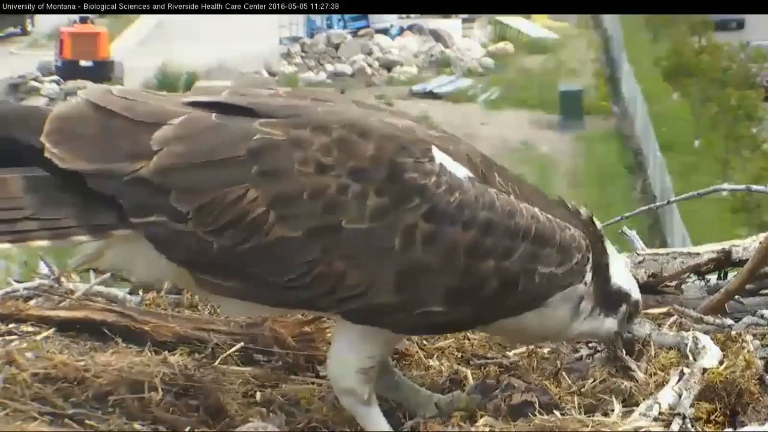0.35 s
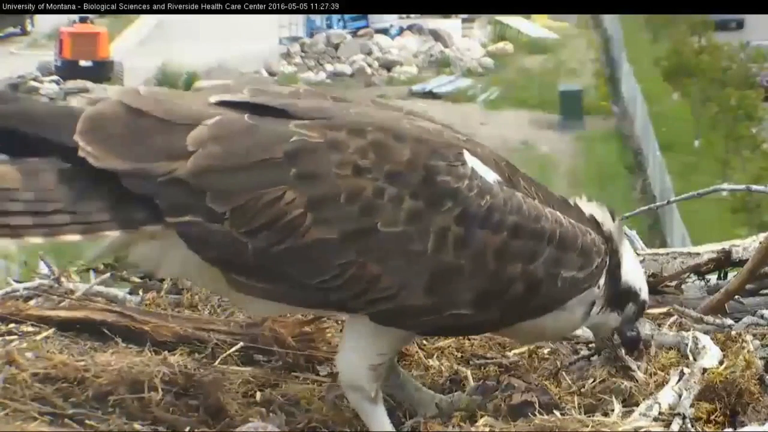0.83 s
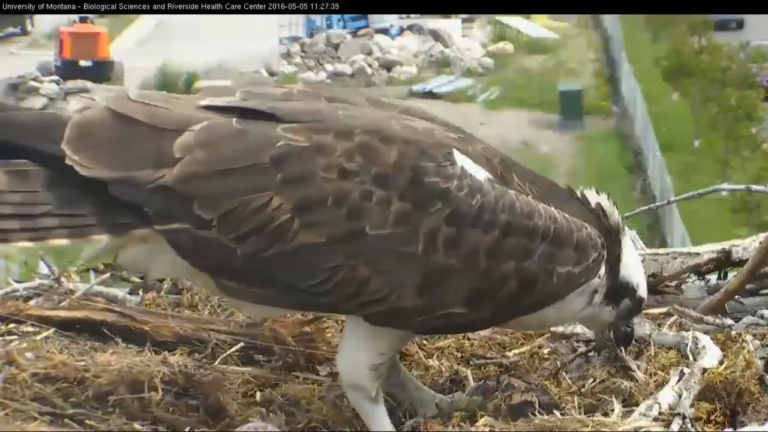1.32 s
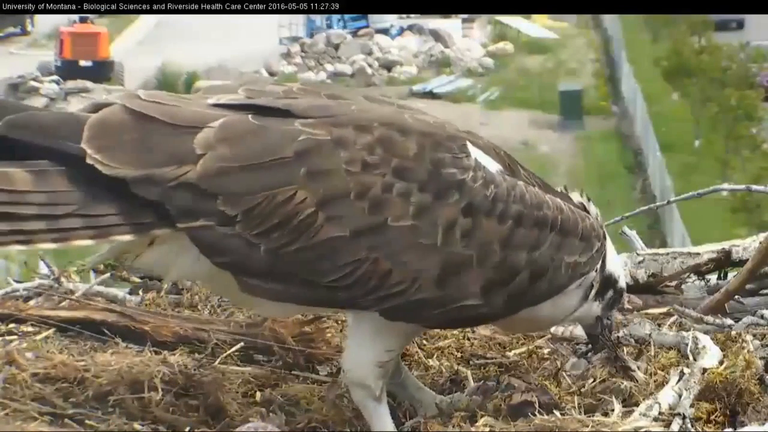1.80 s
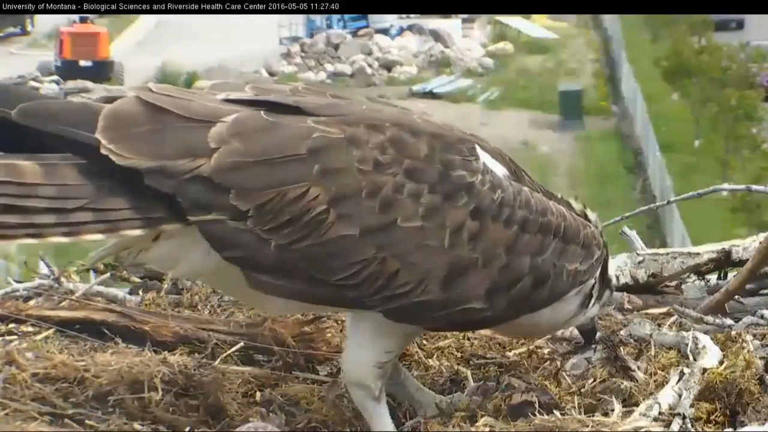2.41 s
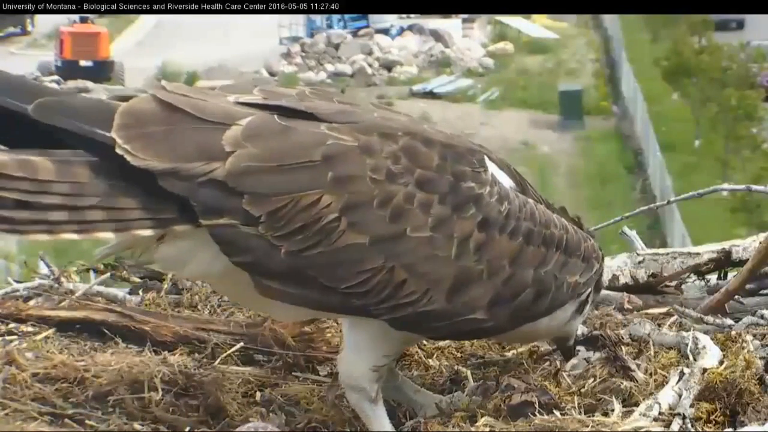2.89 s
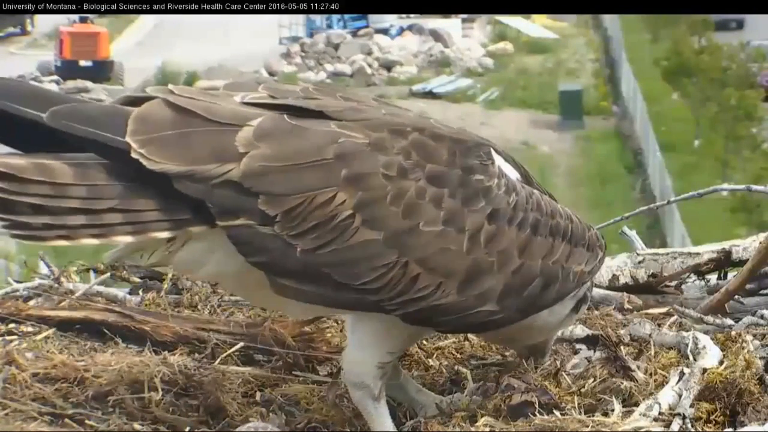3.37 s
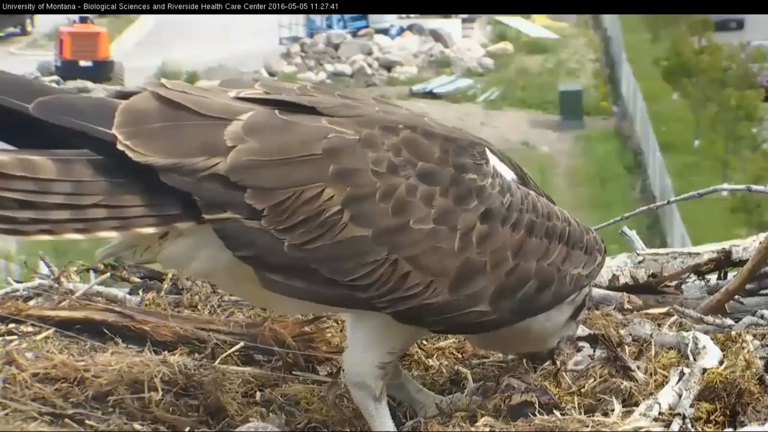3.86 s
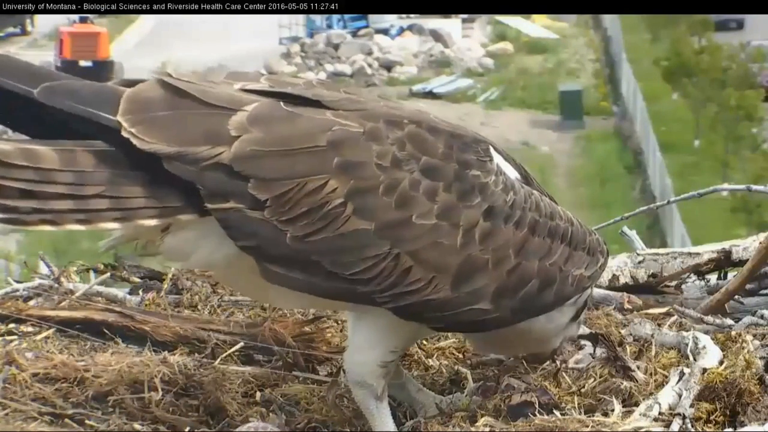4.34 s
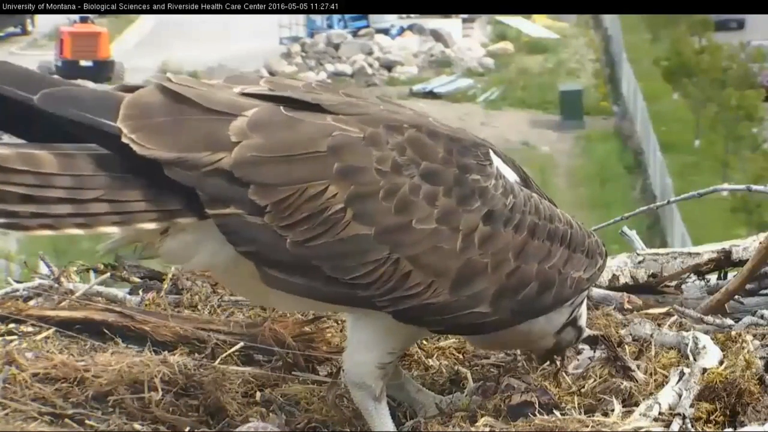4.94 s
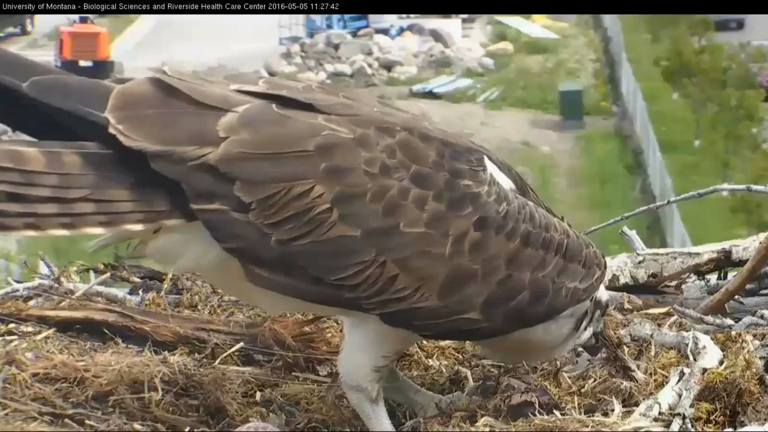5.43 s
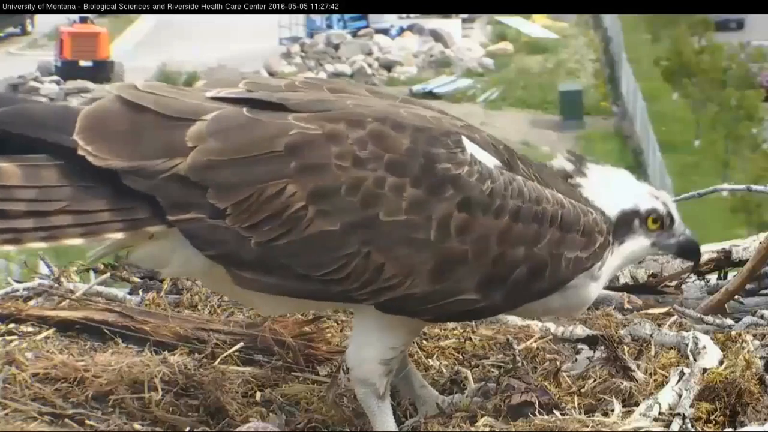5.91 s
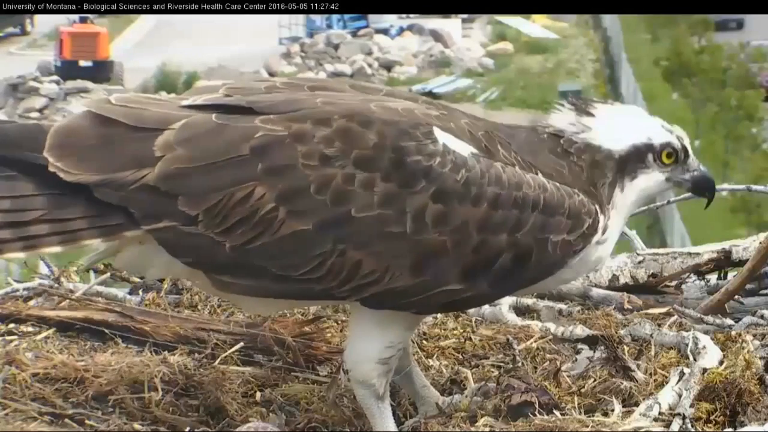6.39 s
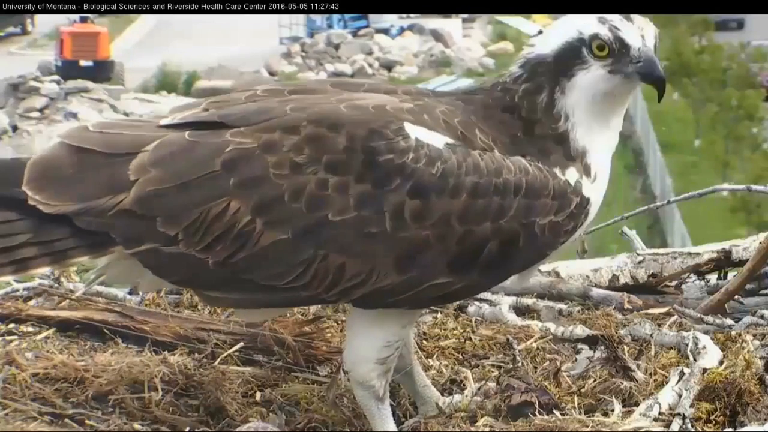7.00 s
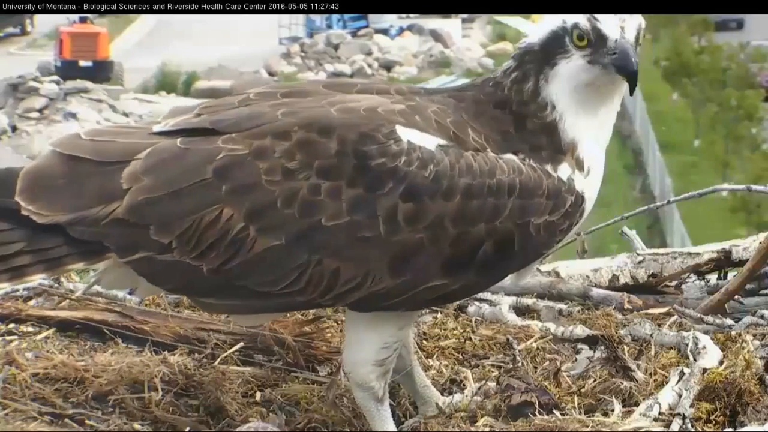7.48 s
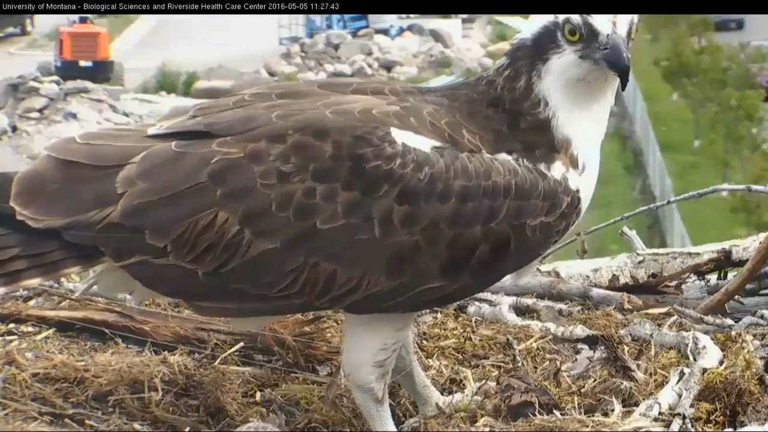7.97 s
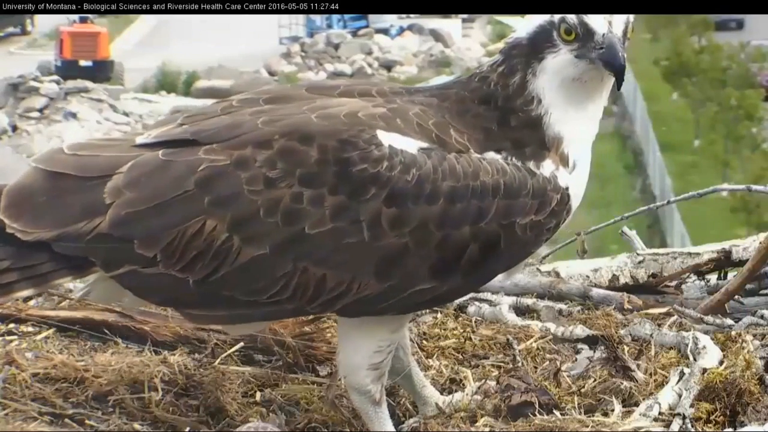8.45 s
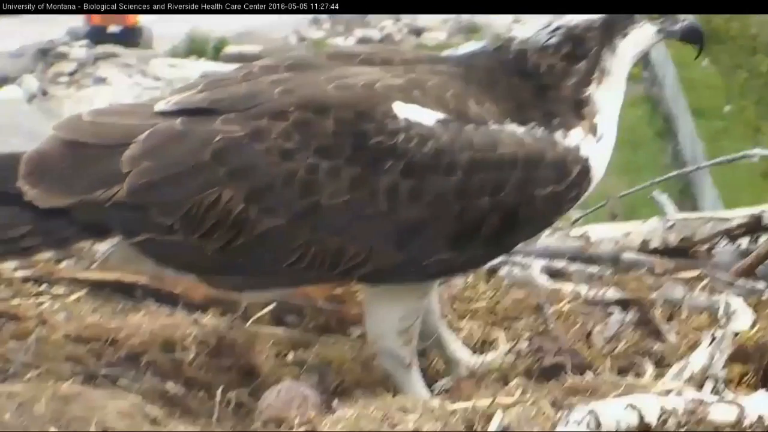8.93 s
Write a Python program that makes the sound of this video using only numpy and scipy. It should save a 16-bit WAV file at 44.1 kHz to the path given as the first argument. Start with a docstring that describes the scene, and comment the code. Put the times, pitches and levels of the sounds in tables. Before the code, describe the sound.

A continuous, slightly fluttering distant traffic roar, low rumble plus a smooth midrange rush, fills the outdoor space and grows very slightly. Beneath it a machine hums steadily, and a faint thin whine wanders up and down, mostly absent from about 4.5 to 6 seconds. The feed blinks off at 0.5, stutters rapidly from 2.5 to 2.7, falls nearly silent until 3.1, then swells back. A small nearby bird gives rough, quick chirps, each a high falling slur followed by a lower note, at about 1.1, 2.2, 3.5, 4.8, 5.7, 6.7, 7.5 and 8.3, with short reflections. Dry twigs crackle and scrape at 5.8 and 6.1 to 6.4; a faint soft horn toots once at 6.1, and the rumble swells slightly near 6.4. Another stutter chops the sound from 8.2 to 8.7, cutting into the last chirp, before the roar and whine return to the end.

```python
"""Far road traffic roars below a high nest platform outdoors, mixed from two bands of coloured noise.
A machine hums on mains harmonics; a thin whine, one wandering sine, rises and falls in and out of earshot.
The microphone's feed breaks off several times and fades back in after each break.
A small bird close by repeats a slurred chirp about once a second, built from gliding arches of pitch.
Late on, nest twigs rustle as grainy noise bursts and a faint far horn toots once."""
import sys
import numpy as np
from scipy import signal
from scipy.fft import rfft, irfft, next_fast_len
from scipy.io import wavfile

SR = 44100
rng = np.random.default_rng(int(sys.argv[2]) if len(sys.argv) > 2 else 0)


def master_out(mix):
    """Clip the mix to full scale and print it as 16-bit PCM to the path in sys.argv[1]."""
    frames = np.transpose(np.atleast_2d(mix))
    ceiling = np.clip(frames, -1, 1)
    pcm = np.round(ceiling * 32767).astype(np.int16)
    wavfile.write(sys.argv[1], SR, pcm)


N = 406602
TIME_S = np.arange(N) / SR
PADDED = 2 * next_fast_len(N // 2 + 1)
BINS_HZ = np.arange(PADDED // 2 + 1) * SR / PADDED


def from_db(db):
    """Decibels to amplitude gain."""
    return 10 ** (np.asarray(db) / 20)


def rms_one(x):
    """Scale to rms 1."""
    return x / np.sqrt(np.mean(x ** 2) + 1e-20)


def drift(rate_hz):
    """Slow random curve of rms 1: low-passed white noise."""
    spectrum = rfft(rng.standard_normal(PADDED))
    return rms_one(irfft(spectrum / (1 + (BINS_HZ / rate_hz) ** 2))[:N])


def noise(spectrum):
    """Coloured noise of rms 1; falls away beyond the end points of its spectrum."""
    hz = np.maximum(BINS_HZ, 1)
    points_hz, density_db = np.transpose(spectrum)
    gain = from_db(np.interp(np.log(hz), np.log(points_hz), density_db))
    gain *= np.minimum(1, hz / points_hz[0]) ** 2
    gain *= np.minimum(1, points_hz[-1] / hz) ** 2
    return rms_one(irfft(rfft(rng.standard_normal(PADDED)) * gain)[:N])


def tone(hz):
    """Sine of rms 1 on a pitch curve, with random start phase."""
    cycles = np.cumsum(hz) / SR + rng.random()
    return np.sqrt(2) * np.sin(2 * np.pi * cycles)


def far_tone(hz):
    """Distant sine, slightly unsteady in pitch and level."""
    wobble_ratio, waver_db = .002, 1.6
    level = from_db(waver_db * drift(14.0))
    return level * tone(hz * (1 + wobble_ratio * drift(15.3)))


def in_time(rows):
    """Curve over TIME_S with cosine easing between turning points."""
    points_s, values = np.transpose(rows)
    index = np.arange(len(points_s))
    place = np.interp(TIME_S, points_s, index)
    eased = np.floor(place) + .5 - .5 * np.cos(np.pi * (place % 1))
    return np.interp(eased, index, values)


def envelope(age_s, length_s, attack_s, release_s):
    """Linear attack, hold and release; silent outside."""
    return np.clip(np.minimum(age_s / attack_s, (length_s - age_s) / release_s), 0, 1)


# far engine spectrum, relative: point_hz, density_db [dB per Hz]
RUMBLE_SPECTRUM = [(25, -29.5), (100, -29.5), (150, -21), (200, -5.5), (250, 0), (300, 1.5), (360, 0),
                   (440, -8), (560, -12), (700, -18.5), (820, -25), (1100, -37)]
# far tyre spectrum, relative: point_hz, density_db [dB per Hz]
TYRE_SPECTRUM = [(700, -41.5), (850, -20), (1050, -7.5), (1500, -3), (1900, -1.5), (2250, 1.5), (2600, 1),
                 (3100, -10), (4200, -8.5), (5200, -13), (5800, -22), (7000, -26.5), (10200, -26.5),
                 (11500, -49)]
RUMBLE_DB, TYRES_DB = -30.5, -25.0  # before rise and flutter
TRAFFIC_RISE_DB_PER_S = 0.0777
PASS_S, PASS_WIDTH_S, PASS_DB = 6.35, .3, 1.1  # a heavier vehicle swells the rumble once


def traffic(flutter_db=0.75):
    """Many far engines merge into a rumble, their tyres into a smooth rush."""
    rumble_db = RUMBLE_DB + PASS_DB / (1 + ((TIME_S - PASS_S) / PASS_WIDTH_S) ** 2)
    roar = from_db(rumble_db) * noise(RUMBLE_SPECTRUM) + from_db(TYRES_DB) * noise(TYRE_SPECTRUM)
    return roar * from_db(TRAFFIC_RISE_DB_PER_S * TIME_S + flutter_db * drift(4.5))


# hum lines: mains_multiple, level_db
HUM_LINES = [(1, -67), (2, -58.5), (3, -46), (4, -32.5), (6, -39.5)]
MAINS_HZ = 60


def hum(waver_db=1.0):
    """Mains-driven machinery; each harmonic wavers in level on its way through the air."""
    total = np.zeros(N)
    for mains_multiple, level_db in HUM_LINES:
        gain = from_db(level_db + waver_db * drift(3.5))
        total += gain * tone(np.full(N, round(mains_multiple) * MAINS_HZ))
    return total


# turning points of the machine's whine: time_s, pitch_hz
WHINE_PITCH = [(0, 1280), (.45, 1245), (1.25, 1255), (1.65, 1322), (2.0, 1268), (2.7, 1460), (3.1, 1470),
               (3.8, 1212), (4.22, 1202), (4.55, 1268), (6.0, 1270), (6.8, 1472), (7.55, 1378),
               (8.25, 1466), (9.2, 1458)]
# stretches in earshot: start_s, end_s, level_db
WHINE_HEARD_SPANS = [(.12, .85, -40), (.85, 1.92, -37.5), (2.055, 3.5, -39.5), (3.297, 4.55, -36.5),
                     (5.945, 7.3, -37), (7.8, 9.4, -35.5)]
WHINE_FADE_S = .15


def whine():
    """A far machine changes speed; its whine fades in and out of earshot."""
    heard = []
    for start_s, end_s, level_db in WHINE_HEARD_SPANS:
        fade = envelope(TIME_S - start_s, end_s - start_s, WHINE_FADE_S, WHINE_FADE_S)
        heard.append(from_db(level_db) * fade)
    return np.max(heard, axis=0) * far_tone(in_time(WHINE_PITCH))


# breaks in the feed: cut_s, back_s, recovery_s [time constant]
FEED_BREAKS = [(.479, .514, .08), (2.538, 2.553, .8), (2.575, 2.593, .05), (2.616, 2.633, .055),
               (2.657, 2.674, .05), (2.718, 3.074, .08), (8.216, 8.234, .065), (8.299, 8.314, .6),
               (8.378, 8.394, 3), (8.460, 8.474, 3), (8.540, 8.694, .08)]
RETURN_DB = -17  # start of the swell, before settling
SETTLE_DB, SETTLE_S = -1, 1  # the last of the level returns slowly


def feed_gain():
    """Each break shuts the sound off almost at once; it comes back low, swells and settles."""
    close_s, leak_db, leak_s = .0012, -27, .011
    gain = np.ones(N)
    for cut_s, back_s, recovery_s in FEED_BREAKS:
        cut, back = int(cut_s * SR), int(back_s * SR)
        age_s, since_s = TIME_S[:N - cut], TIME_S[:N - back]
        leak = from_db(leak_db) * np.exp(-age_s / leak_s)
        gain[cut:] = gain[cut] * np.maximum(np.exp(-age_s / close_s), leak)
        swell = 1 - (1 - from_db(RETURN_DB)) * np.exp(-since_s / recovery_s)
        gain[back:] = swell * from_db(SETTLE_DB * np.exp(-since_s / SETTLE_S))
    return gain


NOTE_ATTACK_S, NOTE_RELEASE_S = 0.0028, 0.0015
LOWEST_HZ = 2750  # glide floor, before jitter
SLIDE_FADE_DB = 7.5  # loss per arch height below the foot


def arch(span_s, length_s, foot_hz, top_hz, peak_db, skew, swell_db, squeeze_db):
    """Pitch and gain of a note: foot, top, foot; held past its span, it slides lower and fades."""
    age_s = np.arange(int(length_s * SR)) / SR
    height = 1 - (2 * (age_s / span_s) ** skew - 1) ** 2
    hz = np.maximum(foot_hz + (top_hz - foot_hz) * height, LOWEST_HZ)
    db = peak_db + swell_db * (age_s / length_s - .5)
    db -= squeeze_db * np.maximum(height, 0) ** 20  # thins at the very top
    db += SLIDE_FADE_DB * np.minimum(height, 0)
    return hz, from_db(db) * envelope(age_s, length_s, NOTE_ATTACK_S, NOTE_RELEASE_S)


# rasp spectrum, relative: point_hz, density_db [dB per Hz]
RASP_SPECTRUM = [(1200, -16), (2800, 3.5), (4500, -1.5), (6000, -9.5), (7700, -5.5), (9000, -8.5),
                 (11000, -12)]
SYRINX_HZ = 3600  # pitch between notes, where the level is zero


def whistle(notes, octave_db=-19, rasp_db=-17, beak_hz=7650, beak_q=13.0):
    """The bird's voice: a rough, raspy whistle whose octave rings in the beak."""
    jitter_ratio, rough_db = .02, 3.1
    pitch_hz, level = np.full(N, float(SYRINX_HZ)), np.zeros(N)
    for start_s, hz, gain in notes:
        on = int(start_s * SR) + np.arange(len(hz))
        pitch_hz[on], level[on] = hz, gain
    pitch_hz = pitch_hz * (1 + jitter_ratio * drift(400))
    octave = signal.lfilter(*signal.iirpeak(beak_hz, beak_q, fs=SR), tone(2 * pitch_hz))
    voice = tone(pitch_hz) + from_db(octave_db) * octave + from_db(rasp_db) * noise(RASP_SPECTRUM)
    return level * from_db(rough_db * drift(300)) * voice


# chirps: start_s, lead_db, high_db, low_db, low_top_hz, low_length_s
CHIRP_NOTES = [(1.112, -48.5, -24, -23.5, 3690, 0.046), (2.209, -53, -23, -17.5, 3904, 0.055),
               (3.47, -45, -25.5, -21.5, 3800, 0.045), (4.804, -49, -23.5, -19, 3730, 0.043),
               (5.679, -40, -23, -19.5, 3680, .038), (6.655, -55, -25.5, -19.5, 3824, .044),
               (7.474, -50, -29, -26.5, 3750, 0.04), (8.33, -51, -25.5, -21.5, 3730, 0.042)]
LEAD_AHEAD_S, LEAD_SPAN_S, LEAD_FOOT_HZ, LEAD_TOP_HZ = 0.029, 0.036, 5380, 6080
HIGH_SPAN_S, HIGH_FOOT_HZ, HIGH_TOP_HZ = .043, 3300, 4570
LOW_AFTER_S, LOW_SPAN_S, LOW_FOOT_HZ = .048, .038, 3230


def bird():
    """Each chirp is a thin lead-in, a high arch that swells as it falls, and a low arch that dies away."""
    leads, notes = [], []
    for start_s, lead_db, high_db, low_db, low_top_hz, low_length_s in CHIRP_NOTES:
        lead = arch(LEAD_SPAN_S, LEAD_SPAN_S, LEAD_FOOT_HZ, LEAD_TOP_HZ, lead_db,
                    skew=.55, swell_db=4, squeeze_db=3)
        high = arch(HIGH_SPAN_S, HIGH_SPAN_S, HIGH_FOOT_HZ, HIGH_TOP_HZ, high_db,
                    skew=.82, swell_db=12, squeeze_db=24.5)
        low = arch(LOW_SPAN_S, low_length_s, LOW_FOOT_HZ, low_top_hz, low_db,
                   skew=1.0, swell_db=-1.5, squeeze_db=4.5)
        leads.append((start_s - LEAD_AHEAD_S, *lead))
        notes.append((start_s, *high))
        notes.append((start_s + LOW_AFTER_S, *low))
    return whistle(leads) + whistle(notes)


# hard surfaces near the bird: delay_s, level_db
NEAR_ECHOES = [(.0046, -4.5), (.0092, -15), (.023, -20), (.055, -19)]


def surroundings(x, scatter_db=-13, t60_s=0.88):
    """A few near reflections beat against the glides; farther things scatter a short tail."""
    near = sum(from_db(level_db) * np.interp(TIME_S - delay_s, TIME_S, x)
               for delay_s, level_db in NEAR_ECHOES)
    tail = rng.standard_normal(SR) * from_db(-60 * TIME_S[:SR] / t60_s)
    scattered = signal.fftconvolve(x, tail / np.linalg.norm(tail))[:N]
    return x + near + from_db(scatter_db) * scattered


# twig rustles: start_s, level_db [before swell and grain], decay_s [time constant]
TWIG_RUSTLES = [(5.826, -19, .015), (6.139, -22, 0.028), (6.21, -35, 0.064), (6.298, -27, 0.052)]
# twig spectrum, relative: point_hz, density_db [dB per Hz]
TWIG_SPECTRUM = [(1800, -24), (2800, 4), (3500, 7), (4500, -2), (5600, -6.5), (8000, -31)]


def twigs(grain_db=4.5, swell_s=.006):
    """Dry sticks shift in short grainy scrapes."""
    level = np.zeros(N)
    for start_s, level_db, decay_s in TWIG_RUSTLES:
        age_s = np.maximum(TIME_S - start_s, 0)
        level += from_db(level_db) * (1 - np.exp(-age_s / swell_s)) * np.exp(-age_s / decay_s)
    return level * from_db(grain_db * drift(150)) * noise(TWIG_SPECTRUM)


HORN_S, HORN_LENGTH_S, HORN_FADE_S = 6.1, 0.202, 0.045
HORN_HZ, HORN_DB = 521, -35.5


def horn():
    """One faint far toot: a soft-edged sine around one pitch."""
    fade = envelope(TIME_S - HORN_S, HORN_LENGTH_S, HORN_FADE_S, HORN_FADE_S)
    return from_db(HORN_DB) * fade * far_tone(HORN_HZ)


def scene():
    """All sources at one microphone; only the bird gets echoes."""
    background = traffic() + hum() + whine() + horn()
    return (background + surroundings(bird()) + twigs())[None]


CUTOFF_HZ = 10950


def record(dry):
    """The microphone rounds peaks lopsidedly, thumping faintly; the feed breaks up, the top is cut."""
    rounded = .65 * np.tanh(dry / .65)
    thump_band = signal.butter(1, [20, 200], "band", fs=SR, output="sos")
    thump = .19 * signal.sosfilt(thump_band, rounded ** 2)
    fed = (rounded - thump) * feed_gain() + 1e-18
    top_cut = signal.ellip(10, .1, 90, CUTOFF_HZ, fs=SR, output="sos")
    return signal.sosfilt(top_cut, fed)


dry = scene()
out = record(dry)
master_out(out)
```